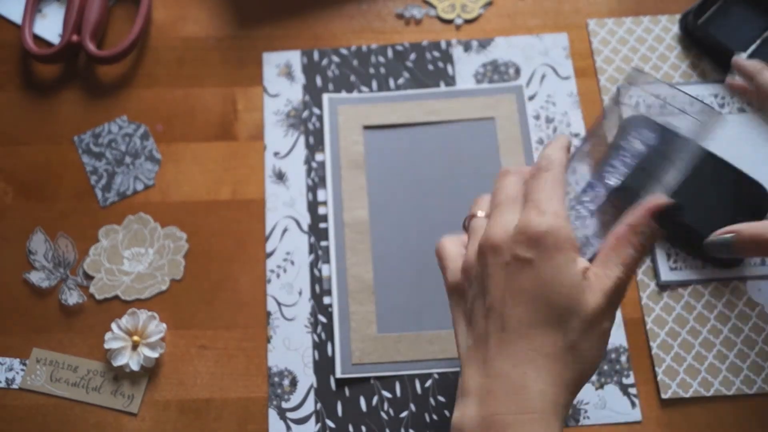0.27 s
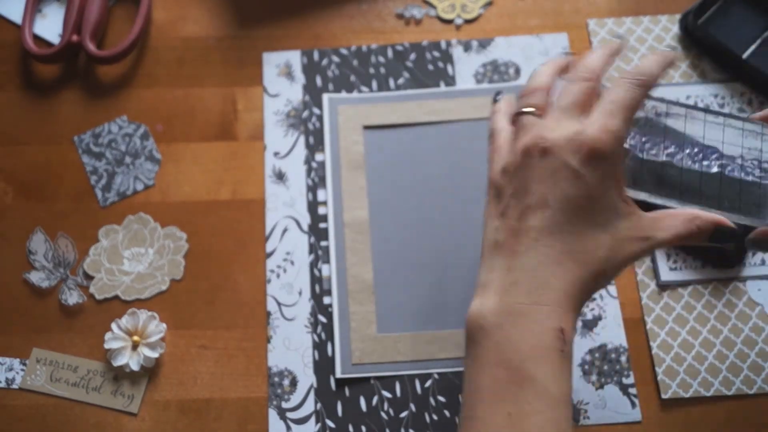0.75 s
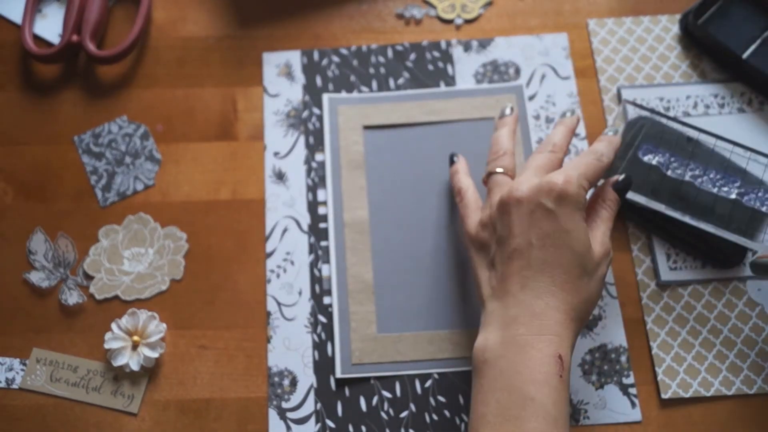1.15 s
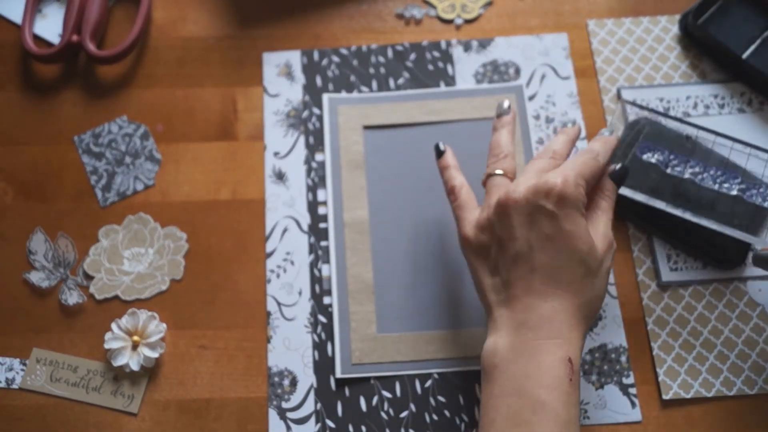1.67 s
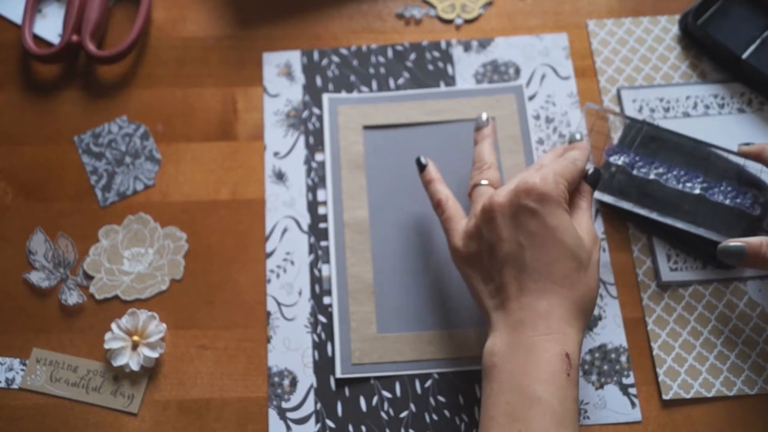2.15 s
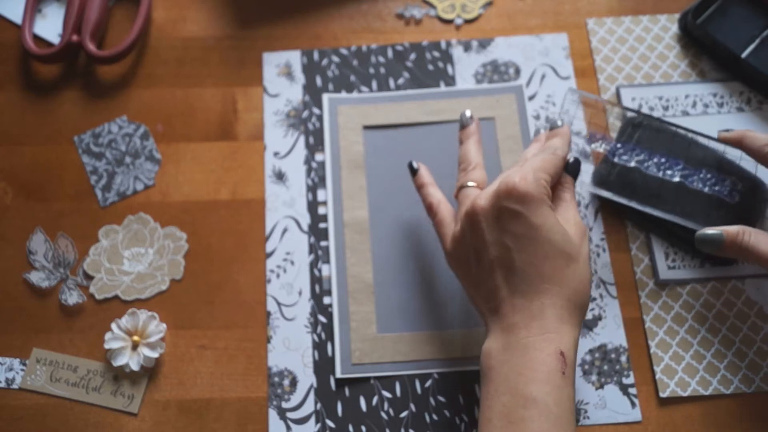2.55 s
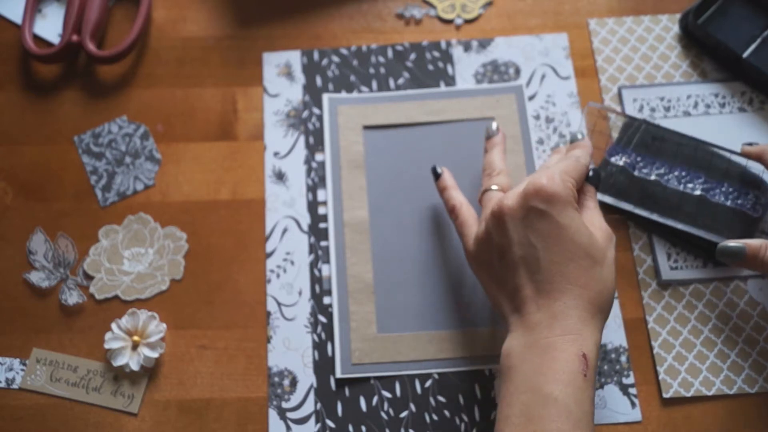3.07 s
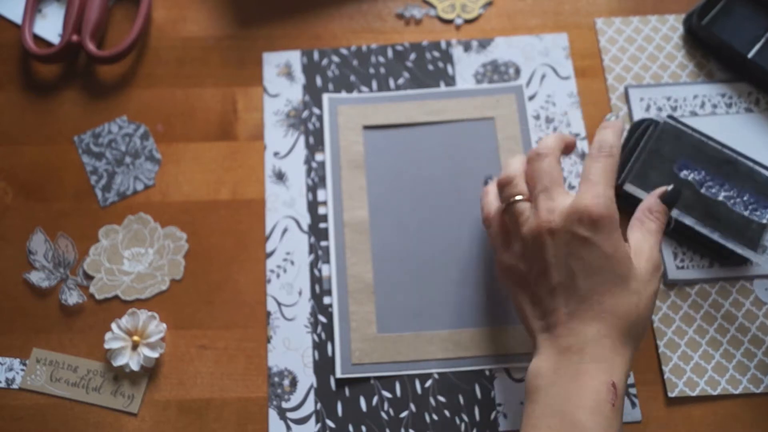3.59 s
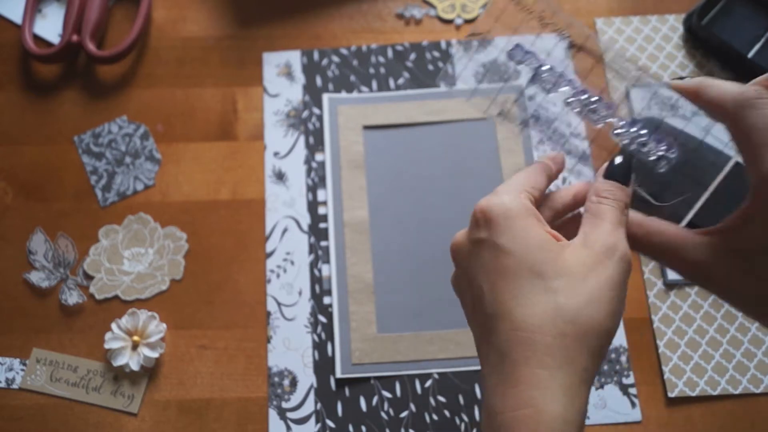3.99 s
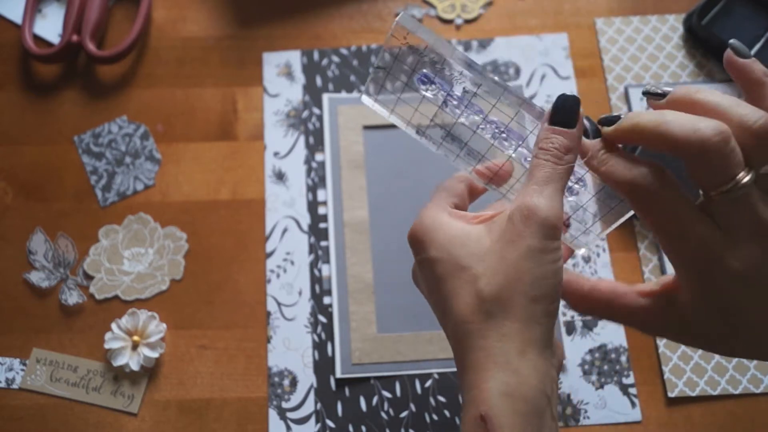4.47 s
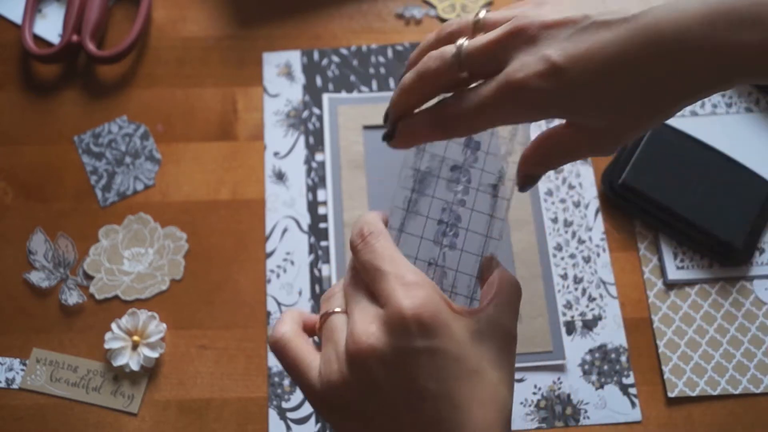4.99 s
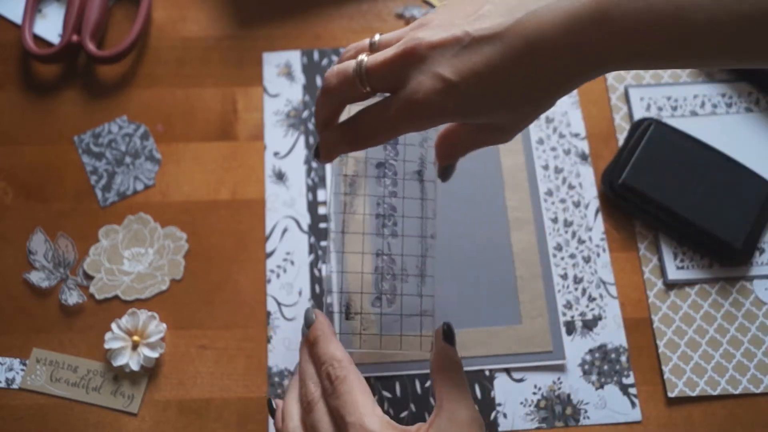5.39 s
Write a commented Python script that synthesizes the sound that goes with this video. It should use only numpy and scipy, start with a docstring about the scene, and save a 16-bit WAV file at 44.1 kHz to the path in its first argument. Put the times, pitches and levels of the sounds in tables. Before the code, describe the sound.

Close, irregular taps of an acrylic stamp on an ink pad, after a quick plastic clatter on wood, in a quiet room.

```python
"""After a faint rub of skin, a plastic ink-pad case clatters onto a wooden craft table in a small room.
An acrylic stamp block is tapped on the pad, close to a pair of microphones: blows on the felt thud
through case and table, blows on the rim make the block clack. Fingernails tick on the acrylic and the
ink lets go with a faint fizz. Under the room's hiss, something passes far outside at the start,
and a low, distant drone swells near the end."""
import sys
import numpy as np
from scipy import signal
from scipy.fft import rfft, irfft
from scipy.io import wavfile
from scipy.ndimage import uniform_filter1d

SR = 44100
rng = np.random.default_rng(int(sys.argv[2]) if len(sys.argv) > 2 else 0)


def master_out(mix):
    """Clip the mix to full scale and print it as 16-bit PCM to the path in sys.argv[1]."""
    frames = np.transpose(np.atleast_2d(mix))
    ceiling = np.clip(frames, -1, 1)
    pcm = np.round(ceiling * 32767).astype(np.int16)
    wavfile.write(sys.argv[1], SR, pcm)


N = 248724
RING_TIME = np.arange(int(.7 * SR)) / SR  # seconds since a contact

# Knocks of case and block: (time [s], force [dB], hardness [Hz], place [0 felt to 1 rim],
BLOWS = [(0.2736, -22, 6740, 0.38, -3, None, 4.5), (0.2889, -19.5, 4300, 0.19, 3, None, -2),
         (0.3024, -36, 2700, 0.035, 17, None, 6), (1.3034, -40.3, 2130, 1, -3, None, 0.5),
         (1.9839, -27.5, 1885, 0.12, 6.5, 0.0079, 1), (2.407, -31, 1400, 0.00047, 3.5, .012, 1),
         (2.7126, -32.5, 825, 0.24, -4, .0136, 0.5), (3.0749, -34, 1250, 0.24, 10, None, -1),
         (3.0827, -37.5, 1290, 0.1, 11, None, 1.5), (3.3593, -26.5, 7000, .98, 1, None, 1.5),
         (3.5992, -27.5, 1520, 0.11, 4.5, None, 0.5)]
# Nails and plastic corners: (time [s], level [dB], t60 [s], low edge [Hz], left over right [dB])
TICKS = [(0.347, -30.5, 0.01, 1200, 2), (3.0742, -44.5, 0.011, 900, 0), (3.595, -38.5, 0.032, 4500, 1),
         (4.345, -58, 0.021, 3000, 0), (4.7012, -19, 0.0015, 500, 0), (4.7027, -27.5, .006, 7000, 4),
         (4.953, -55, .02, 2200, 6)]
# Sliding skin and tacky ink: (time [s], length [s], level [dB], centre [Hz], width [Hz])
RUBS = [(-.06, .28, -65, 5250, 900), (-.1, .4, -66, 3500, 9000), (2.565, .05, -65, 9800, 3000)]
# Modes of the things on the table and of the table itself: (frequency [Hz], level [dB], t60 [s])
TABLE_MODES = [(155.5, -8.5, 0.12), (188.2, -1.5, 0.11), (210, 0, 0.064), (266, 0, 0.044),
               (321, -11, 0.068)]
BOOM_MODES = [(58.75, -7, 0.33), (86.6, -4.5, 0.68), (122.4, -3.5, 0.6)]  # the table top's deep ring
HOLLOW_MODES = [(374.2, -16, 0.21), (457.6, -9.5, 0.17), (486.3, -8, 0.099), (522.6, -8.5, 0.18),
                (553.4, -14, 0.16)]  # the hollow of the case
CASE_MODES = [(477, 1, 0.031), (721.6, -5.5, 0.062), (797, -2.5, 0.044), (969, -2.5, 0.05),
              (1025, -17, 0.11), (1209, -6, 0.039), (1354, -26.5, 0.057), (1564, -13, 0.11),
              (1786, -11.5, 0.058), (2040, -1, 0.01)]
BLOCK_MODES = [(952, -2, 0.057), (1027, -5.5, 0.055), (1385, -11, 0.042), (1637, -10, 0.058),
               (1768, -14, 0.11), (1802, -12, 0.084), (2098, 0.5, 0.023), (2480, -6, 0.024),
               (2663, -6, 0.029), (3074, -11, 0.023), (3510, -2.5, 0.014), (3984, -13.5, 0.034),
               (4010, -10.5, 0.04), (4533, -10, 0.016), (4740, -20, .04), (5080, -16.5, 0.058),
               (5820, -25, 0.029), (6040, -17, 0.036), (7000, -18.5, 0.017)]
# Spectra of the brief crack of a contact: (frequency [Hz], level [dB])
CASE_CRACK = [(80, -22), (250, 1.5), (700, 7), (1400, 10), (2500, 2), (5000, -0.5), (11000, -13)]
BLOCK_CRACK = [(100, -21), (900, -22), (1250, -2), (2200, 4.5), (4000, -4), (7000, -15), (11000, -5)]
TICK_CRACK = [(300, -29), (1200, -14), (3000, -11.5), (5200, -5.5), (6600, -1.5), (8200, -3), (9500, -1),
              (11000, -6)]
# Echoes off surfaces near the microphones: (delay [s], left gain [ratio], right gain [ratio])
ECHOES = [(.00287, 0.48, 0.3), (.0046, 0.19, 1), (.0091, 0.32, .05), (0.0099, 0.066, .25),
          (0.0181, 0.15, .2)]
# Decay of the room's tail: (frequency [Hz], t60 [s])
ROOM_T60 = [(100, 0.49), (250, 0.26), (600, 0.32), (1000, 0.36), (1700, 0.35), (4000, 0.36), (8000, 0.36),
            (11000, 0.18)]
# Spectra of the room's tail and of its hiss: (frequency [Hz], relative level [dB])
ROOM_COLOUR = [(80, -30), (200, -6), (450, -3.5), (900, -0.5), (1800, 2), (4000, 0.5), (10000, 0.5)]
HISS_COLOUR = [(15, -30), (25, -19), (81, -4.5), (107, -10.5), (145, -2.5), (178, -5), (288, -7.5),
               (336, -3.5), (372, -7.5), (433, -6.5), (468, -10.5), (518, -7), (1080, -11), (7700, -22),
               (11000, -26.5), (14300, -126), (22000, -120)]
# How alike tail and hiss reach the two microphones: (frequency [Hz], likeness [0 to 1])
ROOM_LIKENESS = [(100, 1), (500, 0.98), (1000, 0.85), (2000, 0.62), (5000, 0.83), (11000, 0.59)]
HISS_LIKENESS = [(50, 1), (200, 0.86), (600, 0.24), (1500, 0.38), (4000, 0.53), (11000, 0.68)]
# Faint tones in the room: (frequency [Hz], level [dB])
TONES = [(338, -72), (7815, -83.5), (8791, -84)]


def amp(db):
    """Decibels to gain."""
    return 10 ** (np.asarray(db) / 20)


def unit(x):
    """Scales to rms 1."""
    return x / np.sqrt(np.mean(x ** 2) + 1e-20)


def read(points, hz):
    """Reads a table on a log-frequency axis."""
    f, value = np.transpose(points)
    return np.interp(np.log(hz + 1), np.log(f + 1), value)


def freqs(n):
    """The frequencies of an n-sample spectrum."""
    return np.fft.rfftfreq(n, 1 / SR)


def add(mix, s, sound, pan_db=0):
    """Places a two-channel sound at time s, pan_db louder on the left."""
    start = round(s * SR)
    sound = sound[:, max(-start, 0):]
    part = mix[:, max(start, 0):][:, :sound.shape[1]]
    part += amp([[pan_db / 2], [-pan_db / 2]]) * sound[:, :part.shape[1]]


def colour(x, points, size=4096):
    """Causal filter with the given spectrum, so that attacks stay sharp."""
    log_gain = np.log(amp(read(points, abs(np.fft.fftfreq(size, 1 / SR)))))
    taps = np.fft.ifft(np.exp(np.conj(signal.hilbert(log_gain)))).real
    return signal.fftconvolve(x, taps[:size // 2])[:len(x)]


def band(n, hz, width_hz):
    """Noise in one resonance."""
    detuning = (freqs(n) - hz) / width_hz * 2
    return unit(irfft(rfft(rng.standard_normal(n)) / np.sqrt(1 + detuning ** 4), n))


def noise_pair(likeness, n):
    """Spectra of two white noises, as alike as at two closely spaced microphones."""
    mid, side = rfft(rng.standard_normal((2, n)))
    same = np.clip(read(likeness, freqs(n)), 0, 1)
    mid, side = mid * np.sqrt((1 + same) / 2), side * np.sqrt((1 - same) / 2)
    return np.array([mid + side, mid - side])


def decay(t, t60):
    """A fall of 60 dB in t60 seconds."""
    return np.exp(-np.log(1000) * t / np.maximum(t60, 1e-4))


def ring(modes):
    """The sum of an object's dying modes; neighbours start in opposite directions."""
    return sum((-1) ** k * amp(db) * decay(RING_TIME, t60) * np.sin(2 * np.pi * hz * RING_TIME)
               for k, (hz, db, t60) in enumerate(modes))


def crack(spectrum, t60, snap):
    """A first sharp push, sized by snap, then many heavily damped modes heard as one short burst."""
    burst = rng.standard_normal(len(RING_TIME)) * decay(RING_TIME, t60)
    burst[0] -= snap * np.linalg.norm(burst)
    return colour(burst, spectrum) / np.hypot(1, snap)


def room_tone(hiss_db=-58.5):
    """Steady hiss all around the microphones, with faint narrow tones in the centre."""
    hiss = irfft(noise_pair(HISS_LIKENESS, N) * amp(read(HISS_COLOUR, freqs(N))), N)
    tones = sum(amp(db) * band(N, hz, width_hz=4.6) for hz, db in TONES)
    return amp(hiss_db) * unit(hiss) + tones


def passing_roar(nearest_db=-59, nearest_s=0.37, pass_s=0.63):
    """Something passes far outside; its soft roar fades with distance."""
    distance = np.hypot(1, (np.arange(N) / SR - nearest_s) / pass_s)  # 1 when nearest
    return amp(nearest_db) / distance * band(N, hz=400, width_hz=300)


def distant_drone(full_db=-63.5, swell_db=18, start_s=3.62, rise_s=0.98):
    """A low, far-off drone with one overtone swells from faint to full and holds."""
    risen = np.clip((np.arange(N) / SR - start_s) / rise_s, 0, 1)
    drone = band(N, hz=143, width_hz=16) + amp(-9) * band(N, hz=219, width_hz=16)
    return amp(full_db - swell_db * (1 - risen)) * drone


def room(x, onset_s=0.0054, build_s=0.0031):
    """The small room from close up: direct sound, near echoes, then a diffuse tail that dies by band."""
    n = len(RING_TIME)
    noise = irfft(noise_pair(ROOM_LIKENESS, n), n)  # a fresh tail for each contact, as the hands move
    hz, t, bands = signal.stft(noise, SR, nperseg=256)
    _, dying = signal.istft(bands * decay(t, read(ROOM_T60, hz)[:, None]), SR, nperseg=256)
    spectrum = rfft(dying[:, :n])
    power = (abs(spectrum) ** 2).mean(0)
    smooth_power = uniform_filter1d(uniform_filter1d(power, size=32), size=32)
    tail = irfft(spectrum / np.sqrt(smooth_power) * amp(read(ROOM_COLOUR, freqs(n))), n)
    response = tail * np.clip((RING_TIME - onset_s) / build_s, 0, 1) * np.hanning(2 * n)[n:]
    response[:, 0] += 1  # the direct path
    for delay, left, right in ECHOES:
        response[:, round(delay * SR)] += left, right
    return signal.fftconvolve(x[None], response, axes=1)


def close_pair(x, alike_hz=260, side_db=1):
    """Two closely spaced microphones hear the long waves of the bass alike."""
    mid, side = (x[0] + x[1]) / 2, (x[0] - x[1]) / 2
    hz = freqs(N)
    side = amp(side_db) * irfft(rfft(side) * hz / np.hypot(hz, alike_hz), N)
    return np.array([mid + side, mid - side])


def rubs():
    """Skin slides on acrylic and tacky ink lets go: soft swells of high noise."""
    out = np.zeros((2, N))
    for s, length_s, db, hz, width_hz in RUBS:
        n = int(length_s * SR)
        add(out, s, room(amp(db) * band(n, hz, width_hz) * np.hanning(n)))
    return out


def ticks():
    """Nails and plastic corners tick brightly; the smaller the contact, the thinner its tick."""
    out = np.zeros((2, N))
    for s, db, t60, lowest_hz, pan_db in TICKS:
        thin = signal.butter(2, lowest_hz, "high", fs=SR)
        tick = signal.lfilter(*thin, crack(TICK_CRACK, t60, snap=0.19))
        add(out, s, room(amp(db) * tick), pan_db)
    return out


def table_thud(softness, rim, lean_db):
    """The wood thuds more under a soft contact; a rim blow or a leaning hand makes the top boom more."""
    thud = amp(-3.5 + 1.8 * softness) * ring(TABLE_MODES)
    boom = amp(-21 + 6.5 * rim + lean_db) * ring(BOOM_MODES)
    return thud + boom


def case_knock(hollow_db, fill_s=0.0077):
    """The plastic case cracks and rings; its hollow takes a few cycles to fill."""
    shell = ring(CASE_MODES) + amp(5.5) * crack(CASE_CRACK, t60=0.024, snap=0.6)
    hollow = ring(HOLLOW_MODES) * (1 - np.exp(-RING_TIME / fill_s))
    return shell + amp(hollow_db) * hollow


def block_clack(rim, felt_db=-12.5, rim_boost_db=24.5, cross_s=0.00042):
    """The acrylic block rings faintly on the felt and loudly on the rim, which does not cushion it."""
    crossing = 1 - np.exp(-RING_TIME / cross_s)  # bending waves must first cross the block
    acrylic = ring(BLOCK_MODES) + amp(0.5) * crack(BLOCK_CRACK, t60=0.044, snap=0.35)
    return amp(felt_db + rim_boost_db * rim) * crossing * acrylic


def blow(force_db, hard_hz, rim, hollow_db, lean_db, bare_hz=6520):
    """One contact shakes table, case and block; the harder it is, the more it ticks."""
    softness = np.log2(bare_hz / hard_hz)  # octaves below bare plastic
    bodies = table_thud(softness, rim, lean_db) + case_knock(hollow_db) + block_clack(rim)
    tick = amp(-4 - 7.5 * softness) * crack(TICK_CRACK, t60=0.013, snap=0.14)
    cushion = signal.butter(2, hard_hz, fs=SR)  # soft felt lengthens the push and dulls all three
    radiate = signal.butter(2, 85, "high", fs=SR)  # small things give off little bass
    knock = signal.lfilter(*radiate, signal.lfilter(*cushion, bodies))
    return amp(force_db) * (knock + tick)


def blows(lean_from_s=2.9, lean_boom_db=8, rock_s=.0061):
    """Close by, the case is set down and the block taps; if tilted, it lands on one edge first."""
    out = np.zeros((2, N))
    for s, force_db, hard_hz, rim, hollow_db, lead_s, pan_db in BLOWS:
        lean_db = lean_boom_db * (s > lean_from_s)  # the hand leans into the last presses
        add(out, s, room(blow(force_db, hard_hz, rim, hollow_db, lean_db)), pan_db)
        if lead_s is not None:
            edge_hz = hard_hz * min(rock_s / lead_s, 1) ** 2  # the slower it rocks, the softer the touch
            touch = blow(force_db - 5.5, edge_hz, rim=0, hollow_db=-18, lean_db=lean_db)
            add(out, s - lead_s, room(touch), pan_db=-1.5)
    return out


def scene():
    """Stamping and handling close to the microphones, the room and the far outside behind them."""
    foreground = close_pair(blows()) + ticks() + rubs()
    return foreground + room_tone() + passing_roar() + distant_drone()


def record(dry, edge_hz=11250):
    """The recorder's band limit cuts off the top treble."""
    lowpass = signal.firwin(401, edge_hz, window=("kaiser", 8), fs=SR)
    return signal.oaconvolve(dry, lowpass[None], "same")


dry = scene()
out = record(dry)
master_out(out)
```